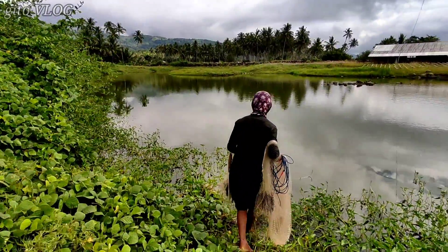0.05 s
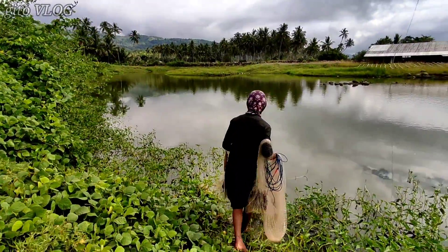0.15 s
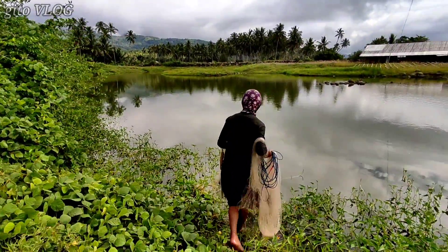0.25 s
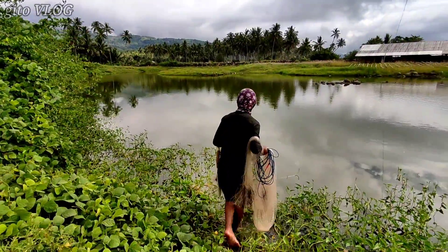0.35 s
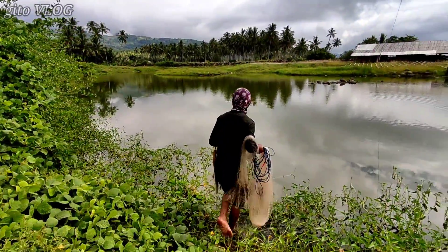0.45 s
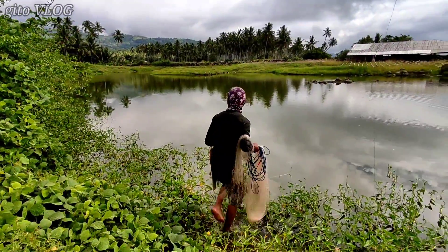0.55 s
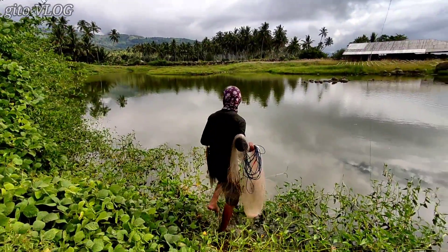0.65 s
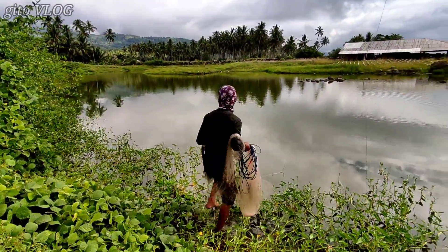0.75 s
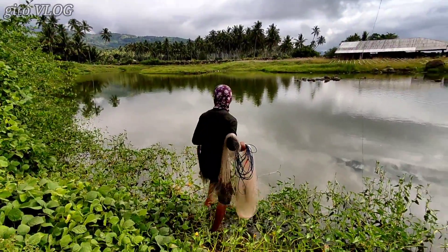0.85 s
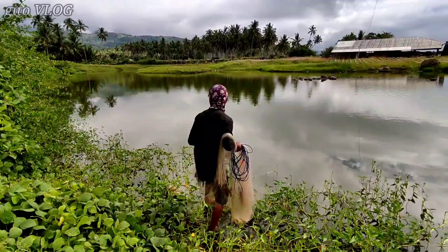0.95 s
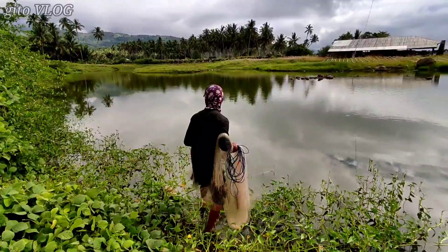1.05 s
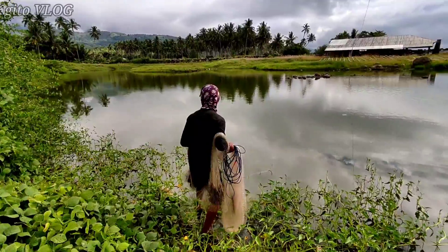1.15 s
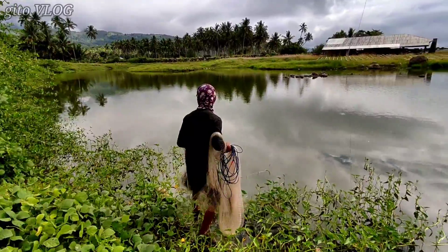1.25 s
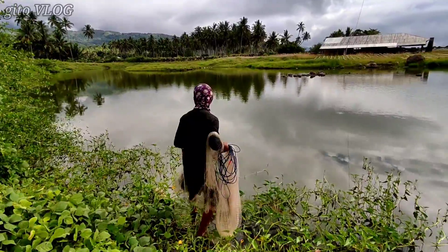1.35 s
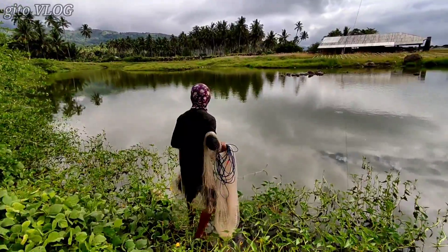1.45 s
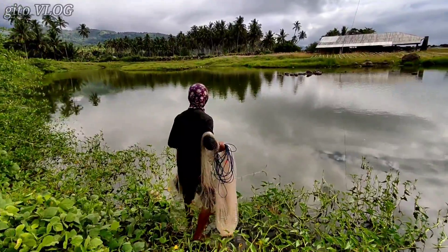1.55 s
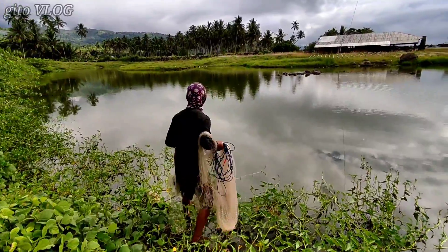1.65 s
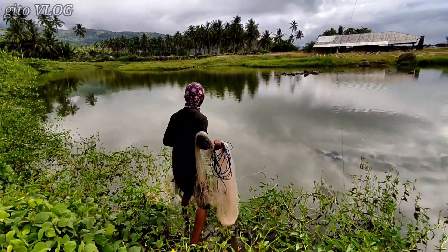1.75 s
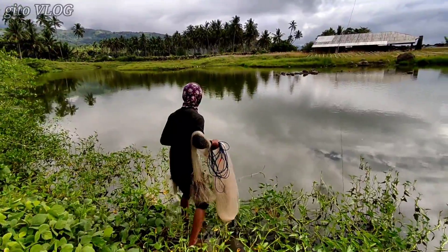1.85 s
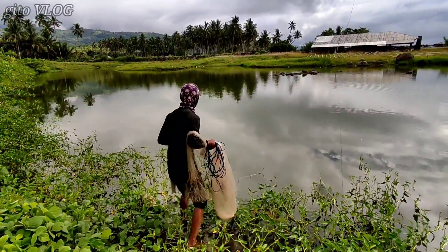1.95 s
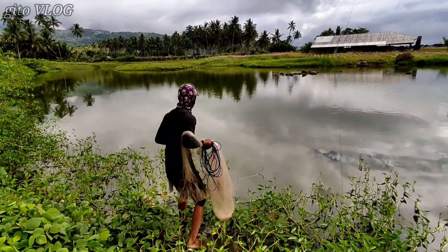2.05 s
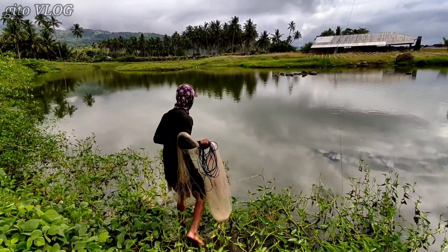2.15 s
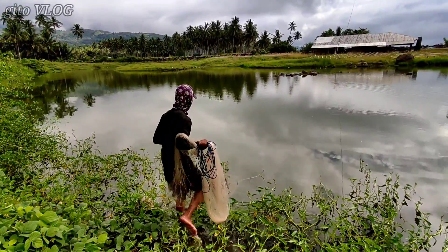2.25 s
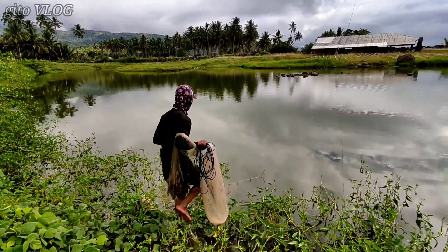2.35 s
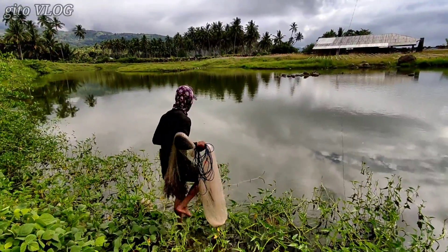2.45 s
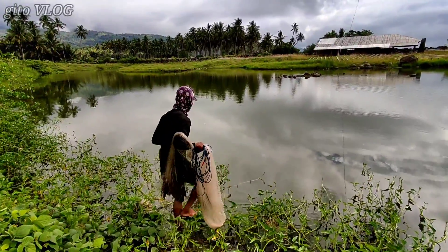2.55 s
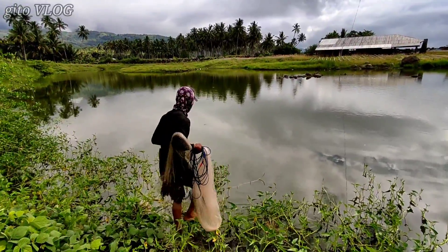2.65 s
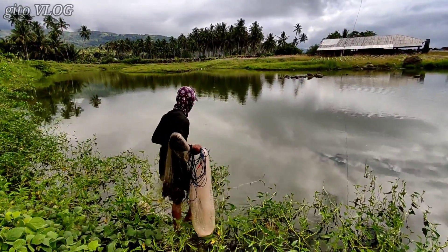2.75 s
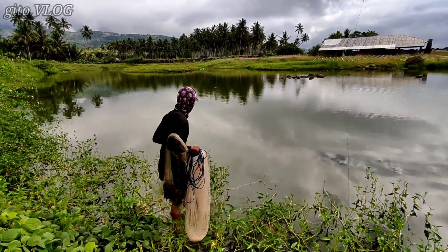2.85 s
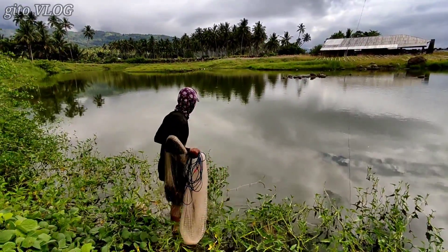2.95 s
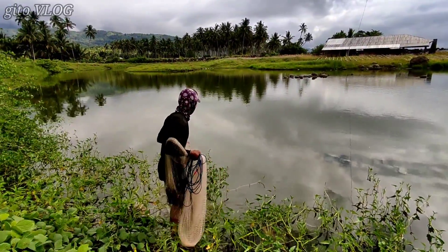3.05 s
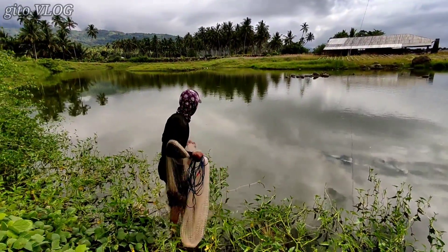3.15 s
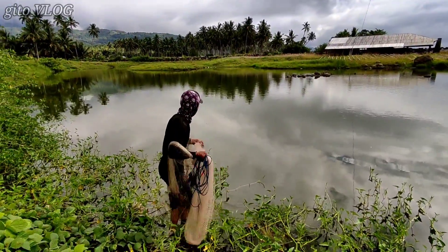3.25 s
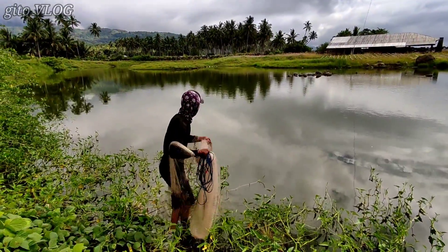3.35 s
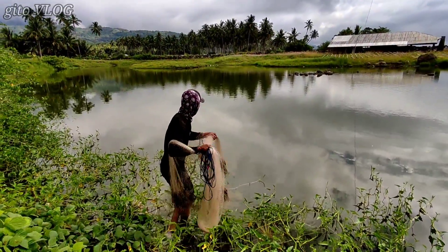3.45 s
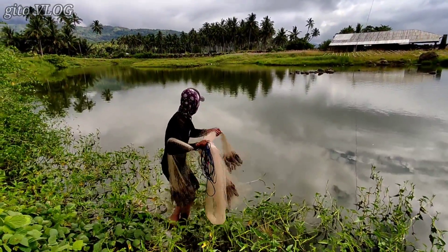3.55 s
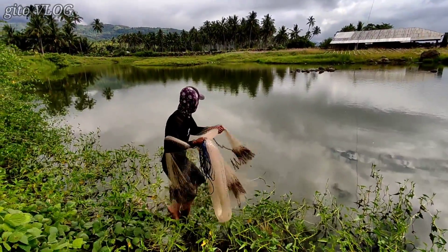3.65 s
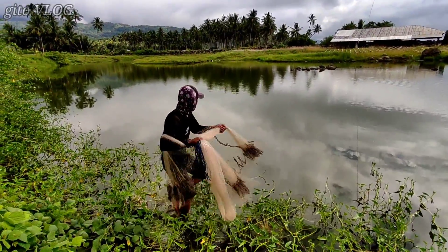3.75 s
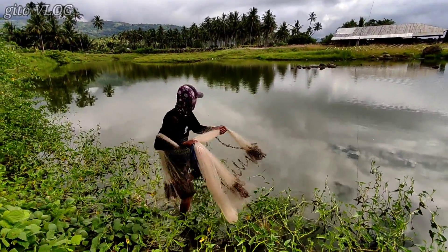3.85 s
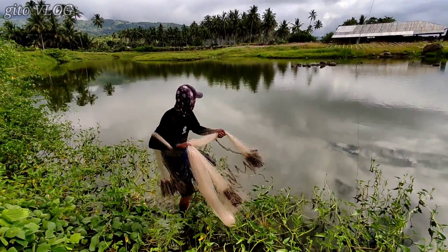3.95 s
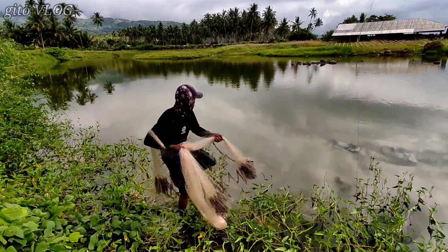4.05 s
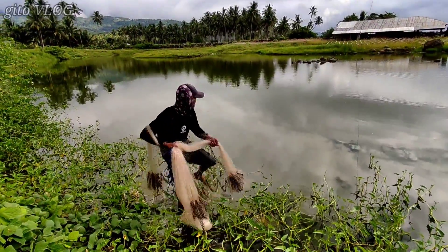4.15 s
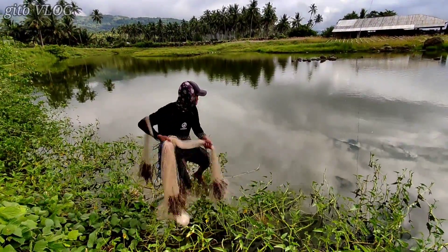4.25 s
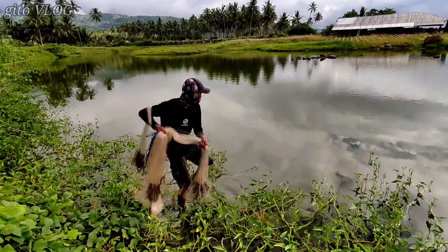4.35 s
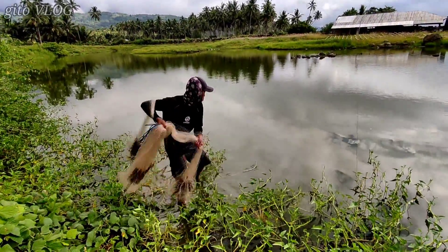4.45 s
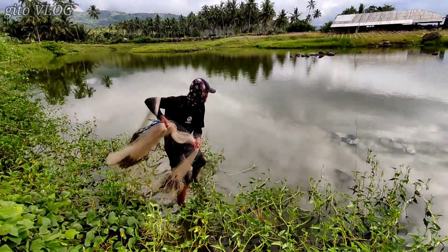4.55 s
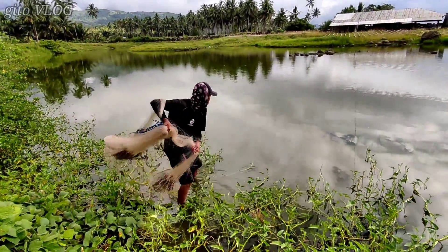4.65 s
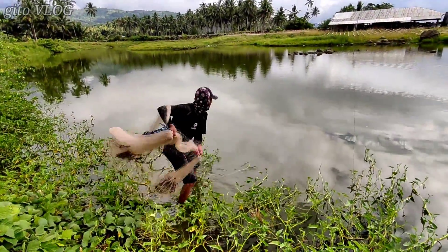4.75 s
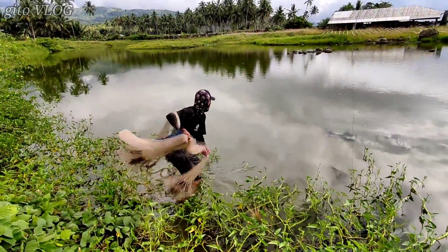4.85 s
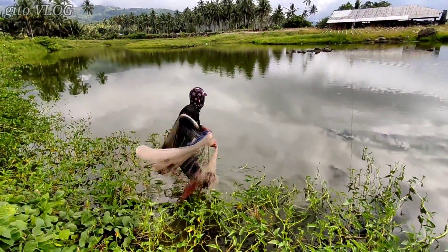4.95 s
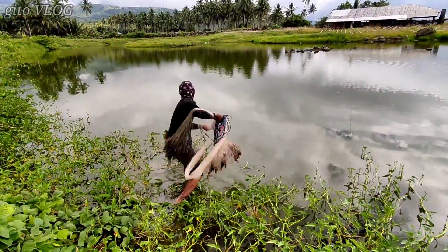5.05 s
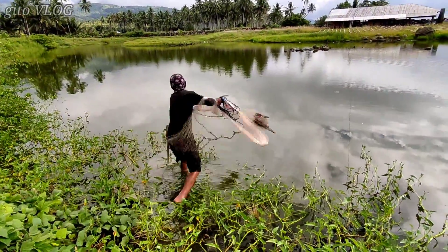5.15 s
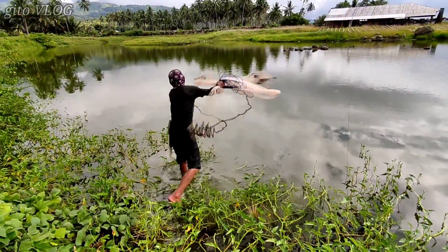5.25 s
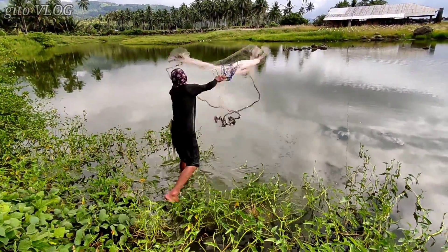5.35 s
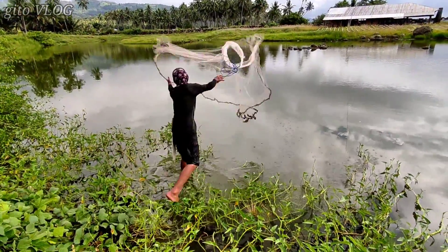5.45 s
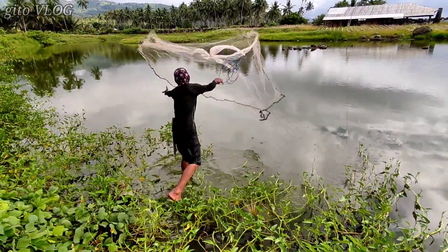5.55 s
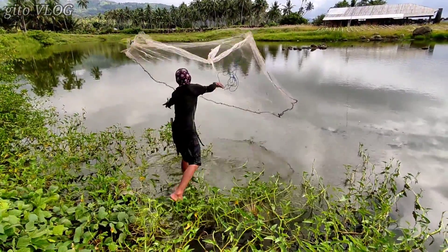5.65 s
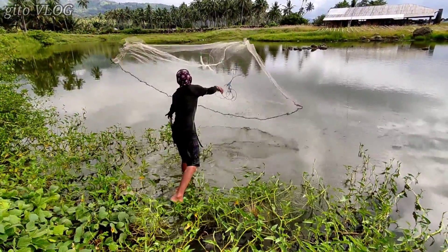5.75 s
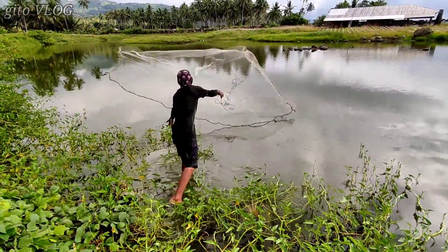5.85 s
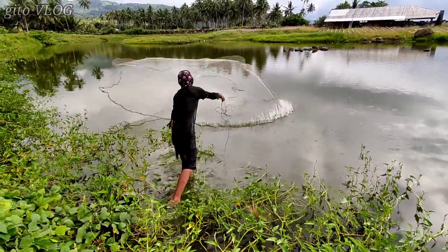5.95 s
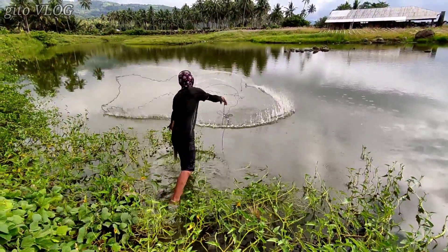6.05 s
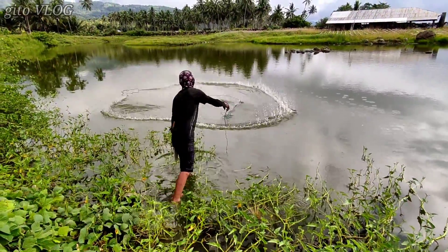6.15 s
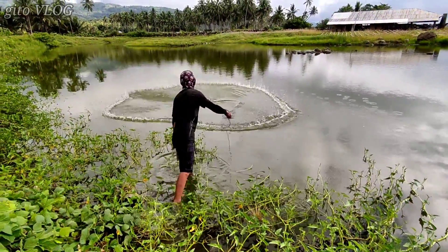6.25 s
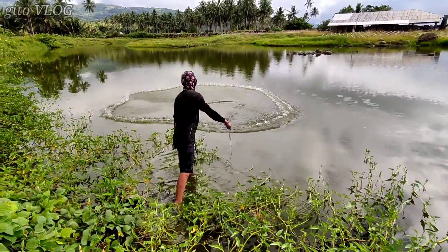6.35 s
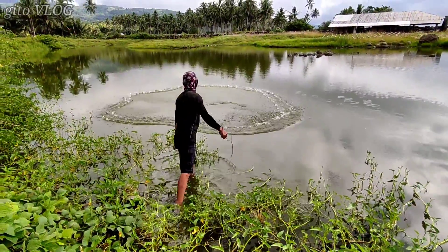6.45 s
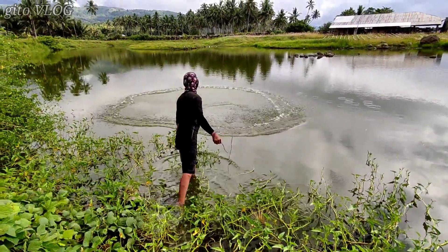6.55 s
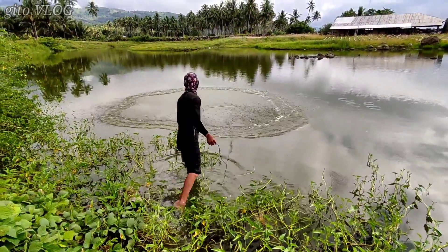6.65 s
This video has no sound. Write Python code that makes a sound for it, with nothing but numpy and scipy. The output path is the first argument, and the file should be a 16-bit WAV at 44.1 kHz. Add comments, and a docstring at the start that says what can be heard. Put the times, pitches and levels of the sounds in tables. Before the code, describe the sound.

Wet footsteps squelch through weeds amid buzzing insects, stems snap, a weighted net jingles as it is thrown, then splashes broadly onto the pond.

```python
"""Cast net at a pond

A fisher wades through wet weeds, swings a weighted net and throws it. Chain, spray, drops and leaves are
clouds of tiny ringing impacts; squelches, thuds and dull cracks are filtered noise bursts; the largest
bubbles are rising sines. Behind them insects buzz as pulsed noise bands and rough tones, faint thin tones
glide near 13 kHz, a far rooster crows, and wind and distant rumble are shaped noise.
"""
import sys
import numpy as np
from scipy import signal
from scipy.fft import rfft, irfft, next_fast_len
from scipy.io import wavfile

SR = 44100
rng = np.random.default_rng(int(sys.argv[2]) if len(sys.argv) > 2 else 0)


def pcm_store(signal):
    """Save signal as 16-bit PCM."""
    levels = np.round(np.clip(np.atleast_2d(signal), -1, 1) * 32767)
    wavfile.write(sys.argv[1], SR, levels.astype(np.int16).T)


N = 295881
TIME = np.arange(N) / SR

# Levels hold ahead of record(). Half-lengths are the sigma of a bell; a T60 is the time to fall 60 dB.
# Every spectrum, each row: frequency in Hz, relative level per Hz in dB.

# Stretches of the weighted rim meeting the water.
# Each row: start in seconds, spray level in dB, level in dB of the air dragged under.
LANDINGS = [(6.005, -19, -42.5), (6.086, -22, -44.5), (6.14, -30, -57), (6.195, -21, -46),
            (6.268, -21.5, -39.5), (6.55, -31.5, -53.5)]
# Largest air pockets closing. Each row: start in seconds, starting level in dB, starting pitch in Hz.
PLOPS = [(6.097, -27, 1200), (6.114, -27, 593), (6.138, -31.5, 608), (6.153, -29, 940), (6.188, -38, 532),
         (6.269, -30, 710), (6.291, -31, 890), (6.349, -29, 677), (6.368, -36, 626), (6.392, -34, 600),
         (6.492, -36, 790), (6.511, -36.5, 612), (6.641, -34.5, 481)]
# Spectrum of fine spray.
SPRAY_SPECTRUM = [(3240, -16), (5500, -15), (6110, -20), (8320, -2.5), (9510, -5.5), (10800, 0),
                  (11400, -5), (14500, -22.5)]
# Spectrum of falling drops.
PATTER_SPECTRUM = [(710, -25), (1200, -2.5), (1590, -4), (2440, -1.5), (2820, -8), (5910, -15), (7000, -5),
                   (9100, -38)]
# Spectrum of small bubbles.
BUBBLE_SPECTRUM = [(200, -38), (300, -18.5), (533, -6), (604, -2.5), (1170, -6), (1600, -10.5)]
SPRAY_RISE_S, SPRAY_T60_S = 0.013, 0.48
PATTER_BELOW_SPRAY_DB, PATTER_RISE_S, PATTER_T60_S = 12.5, 0.027, 0.68
# Spray, patter and stray bubbles of the churned water as the mesh sinks.
FIZZ_DB, DRIZZLE_DB, GURGLE_DB = -35.5, -41.5, -46
SETTLE_RISE_S, SETTLE_T60_S = 0.11, 13
BUBBLE_DELAY_S, BUBBLE_HALF_LENGTH_S = 0.095, 0.021  # trapped air pinches off later

# Chain jerking tight. Each row: start in seconds, level in dB, T60 in seconds.
JERKS = [(5.032, -25, 0.36), (5.06, -37.5, 0.26), (5.529, -31.5, 0.34), (5.612, -26.5, 0.12),
         (5.743, -22.5, 0.064)]
# Swing of the chain over the water. Each row: middle in seconds, level in dB, half-length in seconds.
SWINGS = [(5.63, -35, 0.23)]
# Spectrum of the ringing links.
CHAIN_SPECTRUM = [(4500, -31), (5850, -44), (7020, -27), (7990, -4), (8350, -2), (9700, -22),
                  (10400, -11.5), (10800, -11), (11200, 0), (11500, -9.5), (12500, -17), (14500, -31)]
# Lead weights touching. Each row: start in seconds, starting level in dB, pitch in Hz.
CLINKS = [(2.015, -41, 11400), (2.625, -37, 11280)]
JERK_RISE_S, CLINK_T60_S = 0.0032, 0.11

# Cord and rim whooshing through air.
# Each row: start in seconds, end in seconds, middle pitch in Hz, level in dB.
WHOOSHES = [(5.37, 5.44, 1208, -52.5), (5.79, 5.84, 1890, -51)]
# Whole net rushing through air. Each row: middle in seconds, level in dB, half-length in seconds.
RUSHES = [(5.38, -51.5, .12)]
# Gathered net rasping over itself. Each row: middle in seconds, level in dB, half-length in seconds.
RASPS = [(4.385, -37.5, 0.084), (4.387, -27, 0.0012)]
# Spectra of the mesh paying out, the rasp and the rush.
MESH_SPECTRUM = [(2500, 1), (7000, -3), (13000, 14.5), (14500, 3)]
RASP_SPECTRUM = [(7400, -11), (8700, 5), (9700, -4), (12000, -32)]
RUSH_SPECTRUM = [(1100, 1.5), (2100, 1), (6500, -2)]
MESH_OPENS_S, MESH_DB, MESH_RISE_S, MESH_T60_S = 4.96, -42, 0.09, 2.0

# Legs and net sweeping through weeds. Each row: middle in seconds, level in dB, half-length in seconds.
SWEEPS = [(.5, -58, 0.082), (1.125, -52, 0.039), (1.55, -52, 0.026), (1.872, -51, 0.037),
          (2.295, -53, 0.018), (2.38, -51.5, 0.039), (2.794, -52, 0.17), (2.848, -39.5, 0.0071),
          (3.3, -58.5, 0.058), (3.48, -48, 0.053), (4.35, -52.5, 0.2), (5.587, -54.5, 0.36)]
# Feet sloshing in the shallows. Each row: middle in seconds, level in dB, half-length in seconds.
SLOSHES = [(1.37, -51.5, 0.024), (2.375, -49, 0.028), (4.2, -52.5, 0.053)]
# Mud and water squelching. Each row: start in seconds, peak in dB, resonance in Hz.
SQUELCHES = [(1.156, -44.5, 810), (1.338, -32.5, 1350), (1.36, -35.5, 1320), (1.383, -38.5, 1310),
             (2.355, -31.5, 1520), (2.372, -36, 860), (2.512, -42.5, 1600), (2.63, -43.5, 1530),
             (2.654, -45, 990), (2.816, -35.5, 1970), (2.827, -42.5, 800), (2.888, -45, 945),
             (3.013, -45.5, 1230), (3.465, -34.5, 2040), (4.372, -44.5, 610), (4.425, -46, 800),
             (4.663, -38, 566), (4.704, -43, 400), (4.912, -44.5, 616)]
# Feet bumping soft ground. Each row: start in seconds, peak in dB, resonance in Hz.
THUDS = [(.68, -42.5, 118), (4.152, -34.5, 118), (4.185, -41, 173), (4.778, -47.5, 246)]
# Short dull cracks, some giving body to the bright snaps.
# Each row: start in seconds, peak in dB, resonance in Hz.
DULL_CRACKS = [(1.196, -35, 5500), (2.358, -29, 1800), (2.844, -27, 1290), (2.849, -30, 2600),
               (3.52, -39, 2000), (4.297, -27, 890), (4.4325, -19, 2500), (4.4633, -25, 585),
               (4.787, -32, 5000)]
# Stems snapping and single weights clacking.
# Each row: start in seconds, peak in dB ahead of panning, left minus right in dB.
SNAPS = [(1.112, -28, 13), (1.339, -19, -4), (3.467, -26.5, 13), (4.4441, -12.5, 7), (4.4625, -8, 9),
         (4.787, -20, 16)]
# Spectrum of a snap.
SNAP_SPECTRUM = [(600, -20), (2500, -5), (5000, -7.5), (8000, 5), (10300, 12), (14000, -1)]
# Spectrum of stirred water.
SLOSH_SPECTRUM = [(200, -1.5), (480, -4.5), (750, 6), (1200, -9), (2600, 8.5)]
# Spectra of rustling leaves and of the broad noise on top of each knock.
LEAF_SPECTRUM = [(550, -5.5), (2400, 5.5), (3300, -2.5), (6000, 3.0), (13500, -4.0)]
KNOCK_NOISE_SPECTRUM = [(450, -20), (900, -31), (2500, 23.0), (3500, 16.0), (7000, 9)]
SPLINTER_DB, SPLINTER_DECAY_S = -21, 0.0008  # relative to the click; time constant
FLURRIES_PER_S = 45  # how fast grains of one pitch bunch up and thin out

# Faint, thin, gliding tones near 13 kHz.
# Each row: start in seconds, end in seconds, middle pitch in Hz, level in dB, glide in Hz.
THIN_TONES = [(0.288, .45, 13400, -52, -300), (1.785, 1.88, 12900, -56.5, 2900),
              (1.906, 2.074, 12900, -57, -1900), (2.094, 2.176, 13200, -55, -1400),
              (3.297, 3.517, 13500, -51, 200)]
# Far rooster. Each row: start in seconds, end in seconds, middle pitch in Hz, level in dB.
CROWS = [(0, .45, 1156, -63), (3.38, 3.65, 820, -65.5), (4.92, 5.32, 1168, -65.5)]
# Bush cricket's buzzes. Each row: start in seconds, end in seconds, middle pitch in Hz, level in dB.
BUZZES = [(.25, .55, 10940, -48), (1.0, 1.3, 10970, -47), (1.55, 2.02, 10870, -48.5),
          (2.42, 2.8, 10770, -46.5), (3.25, 3.55, 10940, -49.5), (3.92, 4.29, 10920, -45),
          (4.68, 5.03, 10900, -45)]
# Spectrum of the lower insect chorus.
NEAR_CHORUS_SPECTRUM = [(7000, -47), (7600, -23.5), (8000, 1), (8430, 4.5), (8900, 3.5), (9600, -3.5),
                        (10500, -51)]
# Spectrum of the higher insect chorus.
HIGH_CHORUS_SPECTRUM = [(9500, -15.5), (10300, 3.5), (10780, 0), (11200, -1), (11800, -11.5), (13000, -74)]
# Spectra of the triller and the pulsing cricket.
TRILLER_SPECTRUM = [(7900, -12.5), (8400, 2.5), (8900, -15)]
CRICKET_SPECTRUM = [(8700, -17), (9130, -8), (9650, -22)]

# Gusts on the microphone. Each row: middle in seconds, level in dB, half-length in seconds.
GUSTS = [(.13, -36, 0.044), (.28, -41, 0.046), (.44, -41.5, 0.031), (.7, -43.5, 0.059), (3.7, -54.5, 0.34),
         (6.6, -45.5, 0.19)]
# Spectrum of wind buffeting the ports.
BUFFET_SPECTRUM = [(20, 7.5), (80, 2), (140, -9), (280, -21.5)]
# Spectrum of distant rumble.
RUMBLE_SPECTRUM = [(20, -0.5), (55, 2), (105, 1.5), (145, -6.5), (190, -13.5), (400, -20)]
# Spectrum of the hush of open land.
AIR_SPECTRUM = [(150, -13.5), (350, -18), (700, -18), (1400, -25.5), (2400, -21.5), (3300, -28.5),
                (6500, -23.5), (14000, -26)]
BREEZE_DB, AIR_DB = -55, -56.5  # the breeze lies under the gusts
RUMBLE_START_DB, RUMBLE_GROWS_DB_PER_S = -52.5, 0.28

# Treble balance of the microphone ports. Each row: frequency in Hz, left minus right in dB.
PORT_BALANCE = [(2000, 0), (5000, -0.5), (7000, -1.5), (8400, -8), (9500, -0.5), (10900, 11.5),
                (12200, 10.5), (14000, 3)]
PORT_LAG_SAMPLES, CUTOFF_HZ = 6, 14400  # the left port hears the fisher later


def splash():
    """Weights hit the pond: spray first, then the patter of drops and the bubbles they drag under."""
    settling = surge(LANDINGS[0][0], 0, SETTLE_RISE_S, SETTLE_T60_S)
    spray_gain = from_db(FIZZ_DB) * settling
    patter_gain = from_db(DRIZZLE_DB) * settling
    for s, spray_db, _ in LANDINGS:  # separate stretches add in power
        spray_surge = surge(s, spray_db, SPRAY_RISE_S, SPRAY_T60_S)
        patter_surge = surge(s, spray_db - PATTER_BELOW_SPRAY_DB, PATTER_RISE_S, PATTER_T60_S)
        spray_gain = np.hypot(spray_gain, spray_surge)
        patter_gain = np.hypot(patter_gain, patter_surge)
    pinch_offs = [(s + BUBBLE_DELAY_S, air_db, BUBBLE_HALF_LENGTH_S) for s, _, air_db in LANDINGS]
    bubble_gain = from_db(GURGLE_DB) * settling + swells(pinch_offs)
    spray = grains(SPRAY_SPECTRUM, per_s=12000, cycles=3.5, size_db=-4.5, scatter=5, count=12)
    patter = grains(PATTER_SPECTRUM, per_s=3200, cycles=22, size_db=2.2, scatter=6, count=28, flurry_db=4.5)
    bubbles = grains(BUBBLE_SPECTRUM, per_s=2400, cycles=23, size_db=2, scatter=1.6, count=30)
    return spray_gain * spray + patter_gain * patter + bubble_gain * bubbles + plops()


def plops():
    """A large bubble rings briefly and rises in pitch as it nears the surface."""
    out, t = np.zeros((2, N)), TIME[:SR // 8]
    for s, level_db, hz in PLOPS:
        tone = np.sin(2 * np.pi * hz * (t + t * t)) * (1 - np.exp(-t / .001))
        decay = from_db(level_db - 60 * t * hz / 38)  # 60 dB in 38 starting periods
        add(out, s, tone * decay)
    return from_bank(out)


def chain():
    """Small metal links tick against each other, in surges when the chain jerks tight."""
    jerks = sum(surge(s, level_db, JERK_RISE_S, t60_s) for s, level_db, t60_s in JERKS)
    links = grains(CHAIN_SPECTRUM, per_s=16000, cycles=140, size_db=2.5, scatter=4, count=64)
    return (swells(SWINGS) + jerks) * links + clinks()


def clinks():
    """Two weights touch and ring with one thin, high note."""
    out, t = np.zeros((2, N)), TIME[:SR // 8]
    for s, level_db, hz in CLINKS:
        add(out, s, np.sin(2 * np.pi * hz * t) * from_db(level_db - 60 * t / CLINK_T60_S))
    return out


def net():
    """Mesh swishes as it pays out, rasps over itself and rushes through air; cord and rim whoosh upward."""
    mesh_gain = surge(MESH_OPENS_S, MESH_DB, MESH_RISE_S, MESH_T60_S)
    mesh = mesh_gain * coloured(stereo_noise(alike=0), MESH_SPECTRUM)
    rasp = swells(RASPS) * coloured(stereo_noise(alike=0), RASP_SPECTRUM)
    rush = swells(RUSHES) * coloured(stereo_noise(alike=0), RUSH_SPECTRUM)
    whoosh = calls(WHOOSHES, width_hz=1100, glide_hz=650, arch_hz=0)
    return mesh + rasp + whoosh + rush


def wading():
    """Leaves rustle in flurries against the legs, feet press into wet ground, and stems crack and snap."""
    leaves = grains(LEAF_SPECTRUM, per_s=2400, cycles=16, size_db=2.3, scatter=5, count=30, flurry_db=4.5)
    water = grains(SLOSH_SPECTRUM, per_s=1200, cycles=6.6, size_db=1.5, scatter=1.9, count=14)
    mud = knocks(SQUELCHES, t60_s=0.055, sharpness=3.5, noise_db=-6)
    soil = knocks(THUDS, t60_s=0.13, sharpness=0.98, noise_db=-39)
    cracks = knocks(DULL_CRACKS, t60_s=0.008, sharpness=1.0, noise_db=-4)
    return swells(SWEEPS) * leaves + swells(SLOSHES) * water + mud + soil + cracks + snaps()


def knocks(rows, t60_s, sharpness, noise_db):
    """Noise bursts build and die quickly through a resonance, with broad noise on top."""
    out, t = np.zeros((2, N)), TIME[:SR // 3]
    envelope = (1 - np.exp(-30 * t / t60_s)) * from_db(-60 * t / t60_s)
    for s, level_db, hz in rows:
        burst = rng.standard_normal(len(t))
        width_hz = hz / sharpness
        body = rms_one(resonate(resonate(burst, hz, width_hz), hz, width_hz))
        broad_noise = from_db(noise_db) * coloured(burst, KNOCK_NOISE_SPECTRUM)
        add(out, s, from_db(level_db) * peak_one((body + broad_noise) * envelope))
    return from_bank(out)


def snaps():
    """Each snap is one bright click followed by brief, decaying splinter noise."""
    out, t = np.zeros((2, N)), TIME[:256] - .001  # the click comes 1 ms in
    click = np.arange(len(t)) == np.argmin(np.abs(t))
    decay = (t > 0) * np.exp(-np.abs(t) / SPLINTER_DECAY_S)
    for s, level_db, pan_db in SNAPS:
        splinters = from_db(SPLINTER_DB) * rng.standard_normal((2, len(t))) * decay
        crack = peak_one(coloured(click + splinters, SNAP_SPECTRUM))
        add(out, s, from_db(level_db) * crack * panned(pan_db))
    return out


def insects():
    """Two choruses, a fast triller, a buzzing bush cricket and a pulsing cricket."""
    near = from_db(-43.5) * coloured(stereo_noise(alike=0), NEAR_CHORUS_SPECTRUM)
    trill = strokes(rate_hz=31.9, depth=1, wander=.03)
    triller = from_db(-47.0) * trill * coloured(stereo_noise(alike=0), TRILLER_SPECTRUM)
    waver = from_db(1.3 * drift(4) + 1.5 * drift(45))
    high = from_db(-51.0) * waver * coloured(stereo_noise(alike=0), HIGH_CHORUS_SPECTRUM)
    presence = np.interp(TIME, [.5, 2.6, 4.3, 4.6], [0.41, .4, 0.93, 0.31])
    pulses = strokes(rate_hz=8.3, depth=1.0, wander=0.069) * presence
    cricket = from_db(-45.0) * pulses * coloured(stereo_noise(alike=0), CRICKET_SPECTRUM)
    buzz = strokes(rate_hz=96.6, depth=.8, wander=.02)
    bush_cricket = buzz * calls(BUZZES, width_hz=430, glide_hz=57.4, arch_hz=0)
    return near + triller + high + cricket + bush_cricket


def thin_tones():
    """Faint, thin tones near 13 kHz, each with its own glide and a slight arch in pitch."""
    return sum(calls([tone], width_hz=650, glide_hz=glide, arch_hz=150) for *tone, glide in THIN_TONES)


def rooster():
    """A far rooster's crows: rough tones that sink in pitch."""
    return calls(CROWS, width_hz=95, glide_hz=-66.5, arch_hz=0)


def outdoors():
    """Lumpy wind at the ports over a slowly growing distant rumble and the even hush of open land."""
    gust_gain = (from_db(BREEZE_DB) + swells(GUSTS)) * from_db(2.4 * drift(19))
    wind = gust_gain * coloured(stereo_noise(alike=0.22), BUFFET_SPECTRUM) * panned(pan_db=-5.5)
    rumble_gain = from_db(RUMBLE_START_DB + RUMBLE_GROWS_DB_PER_S * TIME)
    rumble = rumble_gain * coloured(stereo_noise(alike=0.99), RUMBLE_SPECTRUM)
    hush = from_db(AIR_DB) * coloured(stereo_noise(alike=0.26), AIR_SPECTRUM)
    return wind + rumble + hush


def calls(rows, width_hz, glide_hz, arch_hz):
    """Narrow, rough tones that waver in level, slide or arch in pitch and stop."""
    out = np.zeros((2, N))
    for start, end, hz, level_db in rows:
        along = np.linspace(0, 1, int((end - start) * SR))
        size = len(along)
        arch = np.abs(np.sin(np.pi * along))
        pitch_hz = hz + glide_hz * (along - .5) + arch_hz * (arch - .5)
        tone = np.exp(2j * np.pi * np.cumsum(pitch_hz) / SR)
        # independent roughness at each port
        rough = np.array([drift(width_hz, size) + 1j * drift(width_hz, size) for port in range(2)])
        gain = from_db(level_db + 1.9 * drift(18.7, size)) * arch ** .25
        add(out, start, gain * np.real(rough * tone))
    return out


def grains(spectrum, per_s, cycles, size_db, scatter, count=24, flurry_db=0):
    """Random tiny impacts of varied size, direction and ringing pitch, optionally in flurries; rms 1."""
    at = np.flatnonzero(rng.random(N) < per_s / SR)
    draw = rng.random((len(at), 5))
    sign = np.sign(draw[:, 1] - .5)
    size = from_db(size_db * np.minimum(-np.log(1 - draw[:, 0]), 4)) * sign
    lag = np.round(PORT_LAG_SAMPLES + scatter * (2 * draw[:, 2] - 1)).astype(int)
    sides = size * panned(scatter * 2 * (2 * draw[:, 3] - 1))
    pitch_index = (draw[:, 4] * count).astype(int)
    out = np.zeros((2, N))
    for k, hz in enumerate(np.geomspace(spectrum[0][0], spectrum[-1][0], count)):
        mine = pitch_index == k
        flurry = from_db(flurry_db * drift(FLURRIES_PER_S)[at[mine]]) if flurry_db else 1
        impacts = sides[:, mine] * flurry
        clicks = np.zeros((2, N))
        clicks[0, (at[mine] + lag[mine]) % N] = impacts[0]
        clicks[1, at[mine]] = impacts[1]
        out += rms_one(resonate(clicks, hz, 2 * hz / cycles)) * np.sqrt(hz)
    return coloured(out, spectrum)


def swells(rows):
    """Gain of smooth, bell-shaped movements."""
    return sum(from_db(level_db) * np.exp(-.5 * ((TIME - s) / half_s) ** 2) for s, level_db, half_s in rows)


def surge(s, level_db, rise_s, t60_s):
    """Gain that builds from time s and then dies away."""
    age = np.maximum(TIME - s, 0)
    return from_db(level_db - 60 * age / t60_s) * (1 - np.exp(-age / rise_s))


def strokes(rate_hz, depth, wander):
    """Gain of an insect's wing strokes, a little uneven in pace; rms 1."""
    cycles = np.cumsum(rate_hz * (1 + wander * drift(10))) / SR
    return rms_one(1 + np.clip(depth, 0, 1) * np.sin(2 * np.pi * cycles))


def drift(per_s, size=N):
    """Random knots joined by straight lines, with spread about 1."""
    knots = rng.standard_normal(2000)
    return np.interp(TIME[:size] * per_s, np.arange(len(knots)), knots)


def stereo_noise(alike):
    """White noise, partly shared by the two ports."""
    mid, side = rng.standard_normal((2, N))
    alike = np.clip(alike, -1, 1)
    return np.sqrt(1 + alike) * mid + np.sqrt(1 - alike) * side * [[1], [-1]]


def coloured(x, spectrum):
    """Give x a spectrum that falls 88 dB per octave past its ends; rms 1."""
    size = next_fast_len(x.shape[-1])
    hz = np.maximum(np.fft.rfftfreq(size, 1 / SR), 1)
    octaves_out = np.abs(np.log2(hz / np.clip(hz, spectrum[0][0], spectrum[-1][0])))
    gain = from_db(at_hz(spectrum, hz) - 88 * octaves_out)
    return rms_one(irfft(rfft(x, size) * gain, size)[..., :x.shape[-1]])


def resonate(x, hz, width_hz):
    """Two-pole resonance with zeros at 0 Hz and half the sample rate."""
    r = np.exp(-np.pi * width_hz / SR)
    zeros = [(1 - r * r) / 2, 0, (r * r - 1) / 2]
    poles = [1, -2 * r * np.cos(2 * np.pi * hz / SR), r * r]
    return signal.lfilter(zeros, poles, x + 1e-18)


def from_bank(x):
    """A sound from the fisher's side reaches the left port a little later."""
    return np.array([np.roll(x[0], PORT_LAG_SAMPLES), x[1]])


def panned(pan_db):
    """Left and right gains that differ by pan_db."""
    return from_db(np.array([[.5], [-.5]]) * pan_db)


def add(out, s, sound):
    """Mix sound into out from time s."""
    start = int(s * SR)
    out[:, start:start + sound.shape[-1]] += sound[..., :N - start]


def at_hz(points, hz):
    """Read a spectrum in dB along log frequency."""
    points_hz, points_db = np.array(points).T
    return np.interp(np.log(hz), np.log(points_hz), points_db)


def from_db(db):
    """Decibels to amplitude."""
    return 10 ** (np.asarray(db) / 20)


def rms_one(x):
    """Scale to rms 1 over all channels."""
    return x / np.sqrt(np.mean(x ** 2) + 1e-20)


def peak_one(x):
    """Scale to peak 1."""
    return x / np.abs(x).max()


def scene():
    """Sum the net, the fisher and the surroundings."""
    fishing = splash() + chain() + net() + wading()
    return fishing + insects() + thin_tones() + rooster() + outdoors()


def record(dry):
    """Each port colours the treble in its own way; the top is cut steeply."""
    hz = np.maximum(np.fft.rfftfreq(N, 1 / SR), 1)
    ports = irfft(rfft(dry) * panned(at_hz(PORT_BALANCE, hz)), N)
    top_cut = signal.ellip(12, .2, 80, CUTOFF_HZ, fs=SR, output="sos")
    return signal.sosfilt(top_cut, ports)


dry = scene()
out = record(dry)
pcm_store(out)
```